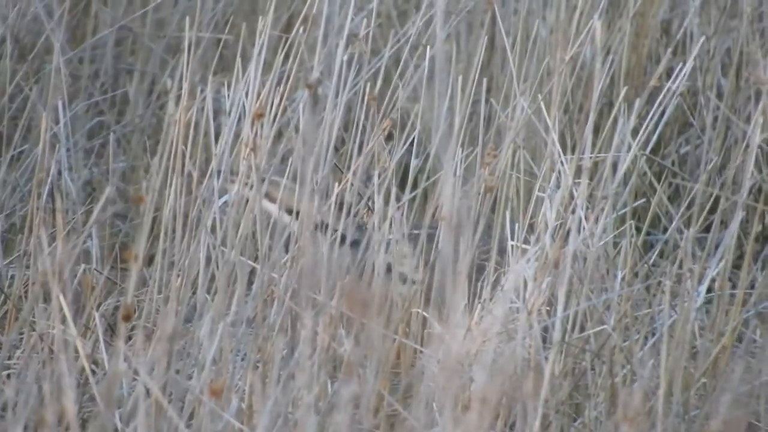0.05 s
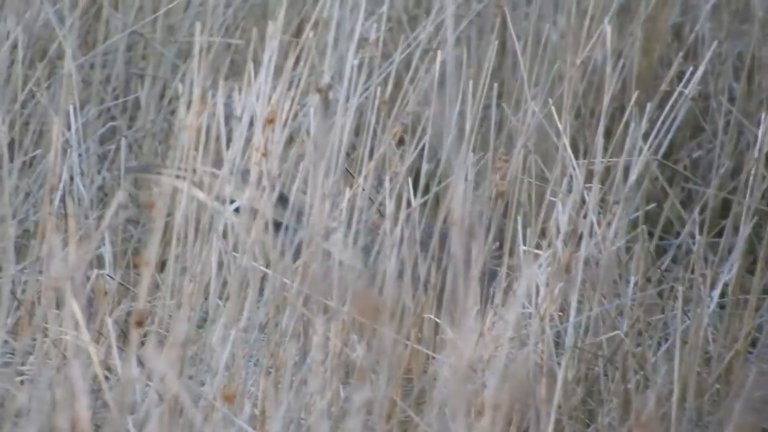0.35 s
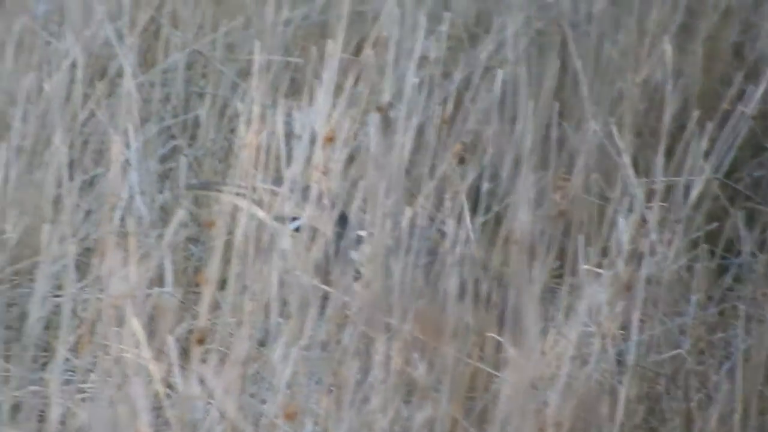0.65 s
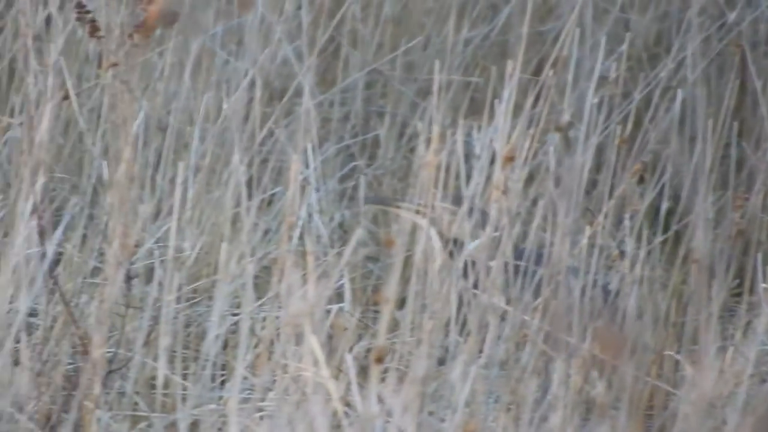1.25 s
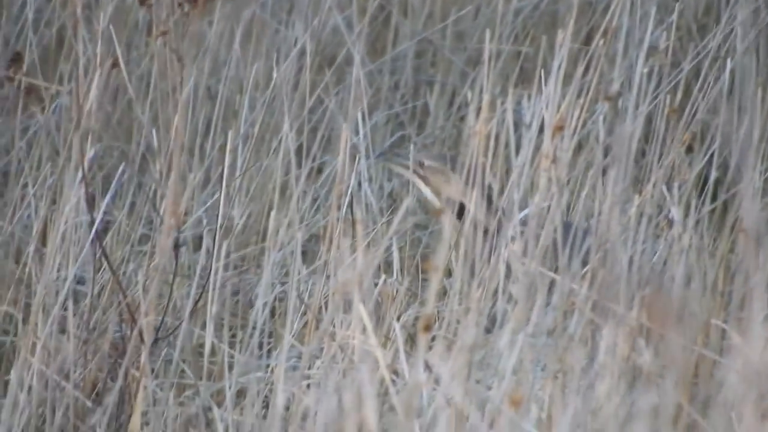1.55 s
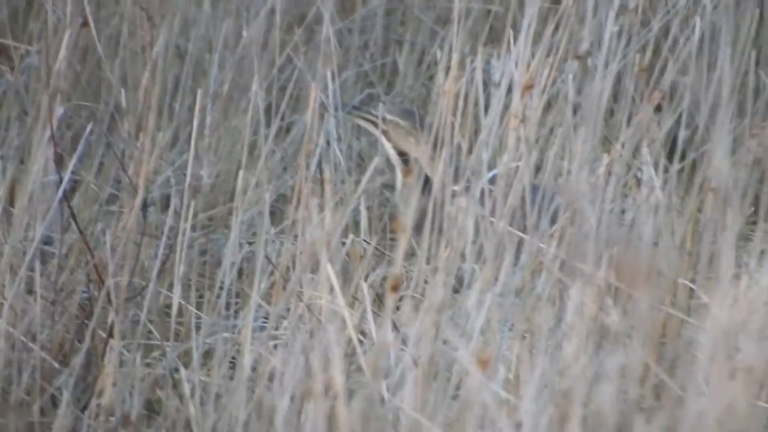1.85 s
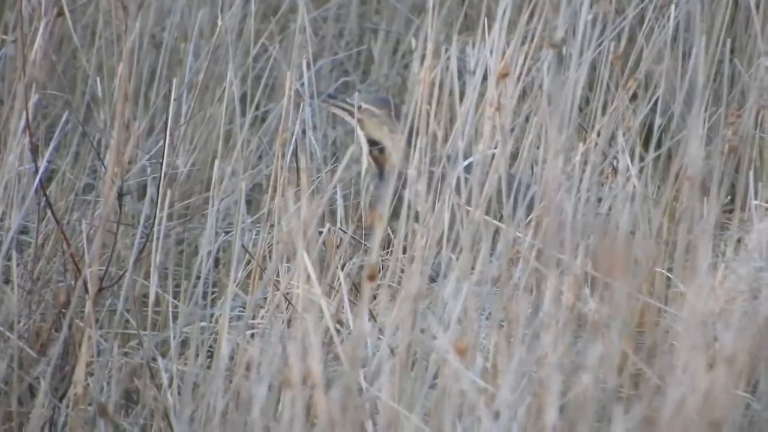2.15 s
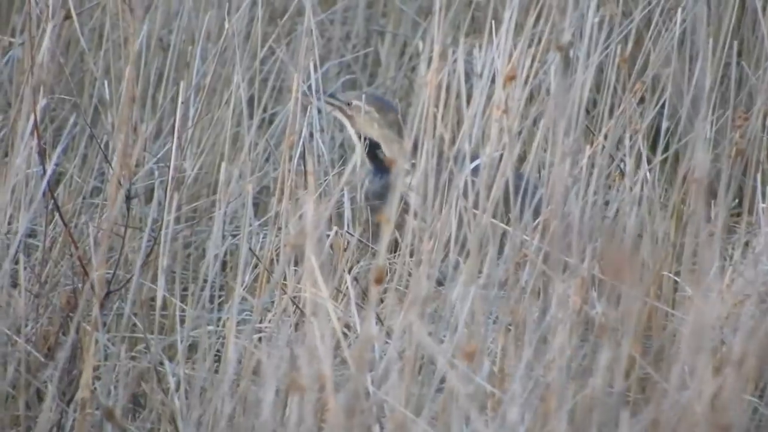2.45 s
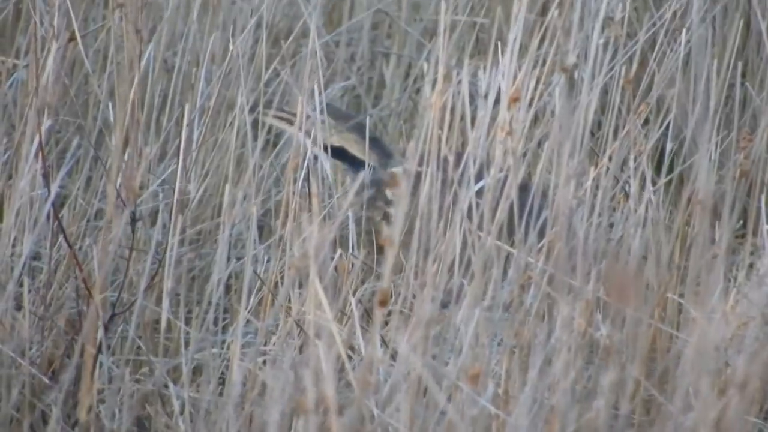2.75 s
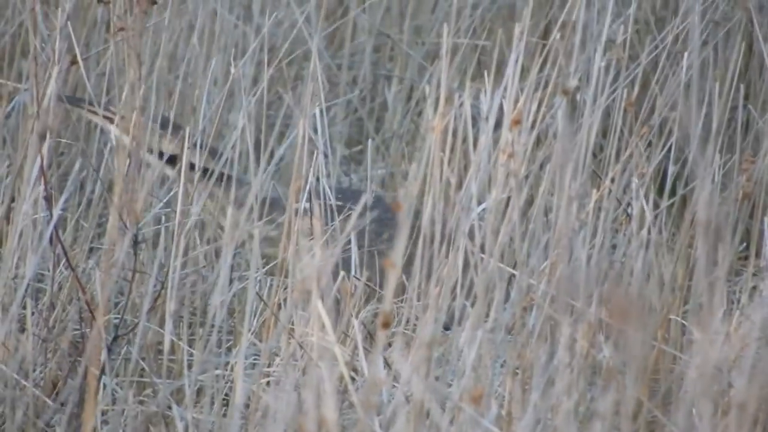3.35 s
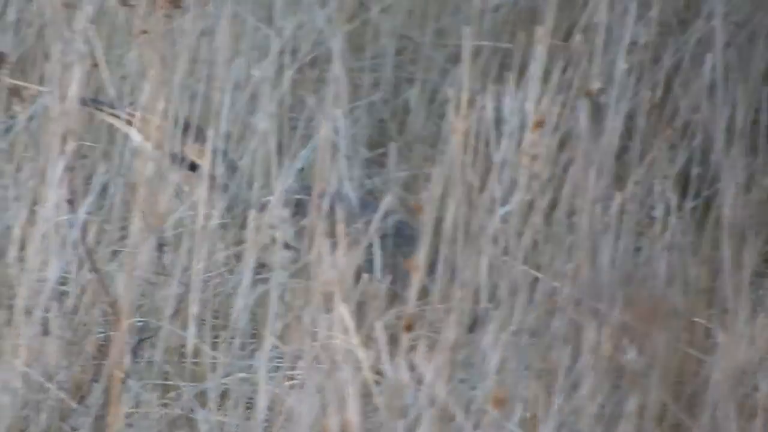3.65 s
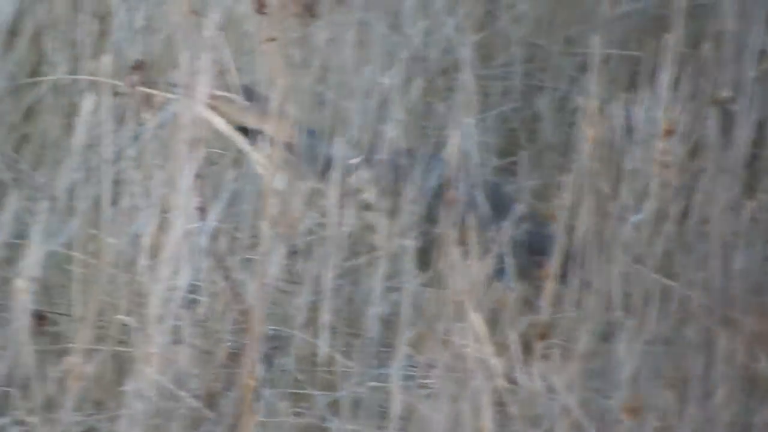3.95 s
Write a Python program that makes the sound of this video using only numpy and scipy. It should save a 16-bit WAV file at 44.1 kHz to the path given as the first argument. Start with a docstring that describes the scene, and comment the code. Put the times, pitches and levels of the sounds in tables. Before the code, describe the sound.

Frogs peep throughout in a reed marsh, one close and many far off. A small bird whistles thin, high notes to the right, then distant birds chip and trill, over soft hiss and a low rumble.

```python
"""Short rising peeps of frogs in a reed marsh, one close by and many far off.
A small bird whistles thin notes to the right; others trill, chip and pipe in the distance.
Each call is a sliding or shaking tone, blurred by echoes from stems and far banks.
Under it all lie a low rumble, soft hiss, a faint whine and a far engine slowly gaining speed."""
import sys
import numpy as np
from scipy import signal
from scipy.fft import rfft, irfft
from scipy.io import wavfile
from scipy.ndimage import uniform_filter1d

SR = 44100
rng = np.random.default_rng(int(sys.argv[2]) if len(sys.argv) > 2 else 0)


def master_out(mix):
    """Clip the mix to full scale and print it as 16-bit PCM to the path in sys.argv[1]."""
    frames = np.transpose(np.atleast_2d(mix))
    ceiling = np.clip(frames, -1, 1)
    pcm = np.round(ceiling * 32767).astype(np.int16)
    wavfile.write(sys.argv[1], SR, pcm)


N = 176400  # 4 seconds


def amp(db):
    """Turns decibels into a number to multiply by."""
    return 10 ** (np.asarray(db) / 20)


def unit(x):
    """Scales a signal to an average power of 1."""
    return x / np.sqrt(np.mean(x ** 2) + 1e-20)


def look_up(points, hz):
    """Reads between the rows of a (frequency, value) table, giving every octave equal room."""
    f, value = np.transpose(points)
    return np.interp(np.log(hz + 1), np.log(f), value)


def add(mix, start, sound):
    """Mixes in a stereo sound at a start time in seconds."""
    at = round(start * SR)
    sound = sound[:, max(-at, 0):]
    part = mix[:, max(at, 0):][:, :sound.shape[1]]
    part += sound[:, :part.shape[1]]


def pan(db):
    """Left and right gains: above 0 dB the sound leans left, below it right."""
    return amp([[db / 2], [-db / 2]])


def phase_of(hz):
    """Adds up a changing pitch into the angle of a sine wave."""
    return 2 * np.pi * np.cumsum(hz) / SR


def wander(size, rate_hz):
    """Smooth random drift, about 1 in size; a higher rate moves faster."""
    spectrum = rfft(rng.standard_normal(max(size, SR)))
    hz = np.linspace(0, SR / 2, len(spectrum))
    return unit(irfft(spectrum * np.exp(-.5 * (hz / rate_hz) ** 2)))[:size]


def roughen(note, depth, rate_hz):
    """Makes a note flutter unevenly while keeping its average power."""
    return note * (1 + depth * wander(len(note), rate_hz)) / np.sqrt(1 + depth ** 2)


def reeds(x, fade_s, build_s=0.0024):
    """Stems and far banks throw back a spray of small echoes that falls 60 dB in fade_s."""
    t = np.arange(SR * 3 // 4) / SR
    echoes = rng.standard_normal((3, len(t))) * amp(-60 * t / fade_s) * np.minimum(t / build_s, 1)
    tail = echoes[:2] + 0.56 * echoes[2]  # both ears share a part
    tail /= np.linalg.norm(tail, axis=1, keepdims=True)
    return signal.fftconvolve(x, tail, axes=1)[:, :N]


def noise(shape, patchy_db, lull_db=0, lull_hz=870, lull_at_s=2.5, lull_width_s=0.3):
    """Stereo noise of a given tone colour, with drifting patches and an optional brief midrange dip."""
    # how alike the two ears are: f/Hz, likeness (0 to 1)
    likeness = [(30, 0.57), (90, 0.74), (190, 0.78), (350, 0.49), (1200, 0.6), (2500, 0.21), (6000, 0.078)]
    hz = np.fft.rfftfreq(4096, 1 / SR)
    a, b, c, d, patches = rng.standard_normal((N // 1024 + 5, len(hz), 5)).T
    patches = uniform_filter1d(patches, size=20, axis=0)  # smooth across pitch
    patches = unit(uniform_filter1d(patches, size=5, axis=1))  # and across time
    same = look_up(likeness, hz)[:, None]
    left = a + 1j * b
    right = same * left + np.sqrt(1 - same ** 2) * (c + 1j * d)
    t = np.linspace(0, N / SR, left.shape[1])
    lull = np.exp(-np.log2((hz[:, None] + 1) / lull_hz) ** 2 - ((t - lull_at_s) / lull_width_s) ** 2)
    gain = amp(look_up(shape, hz)[:, None] + patchy_db * patches + lull_db * lull)
    _, sound = signal.istft(gain * np.array([left, right]), nperseg=4096, noverlap=3072)
    return unit(sound[:, :N])


def rumble(level_db=-51.5):
    """A far rumble: deep noise that swells and sinks."""
    # the swell: t/s, level change/dB
    swell = [(0, 0), (.4, 0.5), (.55, 2.5), (.8, -0.5), (1.12, 5), (1.35, -3.5), (1.65, 2), (4, 1)]
    # tone colour: f/Hz, relative level/dB
    shape = [(20, -37), (35, -17), (55, -10.5), (80, 2.5), (130, -2), (190, 3), (240, -8.5), (300, -33),
             (1200, -70)]
    swell_db = np.interp(np.arange(N) / SR, *np.transpose(swell))
    return amp(level_db + swell_db) * noise(shape, patchy_db=1.0)


def hiss(level_db=-51.5):
    """The soft hiss of the air; its middle range eases once for a moment."""
    # tone colour: f/Hz, relative level/dB
    shape = [(28, -7.5), (330, 1.5), (480, -1.5), (800, 1.5), (1250, -2), (1700, -3.5), (2600, -4.5),
             (4000, -3), (6500, -5), (8500, -5.5), (11000, -12.5), (15500, -19.5)]
    return amp(level_db) * noise(shape, patchy_db=2.5, lull_db=-3)


def whine():
    """A very faint, high whine of three pure tones."""
    # steady tones: f/Hz, level/dB
    tones = [(7434, -78.5), (7483, -77), (12947, -82)]
    t = np.arange(N) / SR
    return sum(np.sqrt(2) * amp(db) * np.sin(2 * np.pi * hz * t) for hz, db in tones)


def engine():
    """A far engine gains speed: one low, slowly climbing note with a trace of its octave."""
    # path of the hum: t/s, f/Hz, level/dB
    hum = [(0, 143, -71), (.7, 145.3, -55.5), (1.15, 149.9, -46.5), (1.55, 153.4, -48.5), (2, 157.1, -46),
           (2.6, 160.5, -45), (3.25, 163.5, -43.5), (4, 165.9, -48)]
    times, hz, db = np.transpose(hum)
    t = np.arange(N) / SR
    phase = phase_of(np.interp(t, times, hz) + 0.602 * wander(N, 1.26))
    level = amp(np.interp(t, times, db) + .5 * wander(N, 0.56))
    return np.sqrt(2) * level * (np.sin(phase) + amp(-31) * np.sin(2 * phase))


def bird_pipes(edge_s=0.004):
    """Far birds pipe faint, reedy notes: tones that slide and flutter."""
    # notes: start/s, length/s, f/Hz, rise/Hz, level before echo/dB, flutter depth
    notes = [(1.632, 0.044, 5600, 94, -57.5, .4), (2.88, .125, 2180, -20, -62.5, 0.29),
             (3.5, 0.18, 4700, 242, -63, 1.2), (2.907, .12, 6080, 252, -66, 1.3),
             (3.338, .032, 5550, 200, -55, 0.66), (3.31, 0.131, 2630, 50, -55, 0.57)]
    out = np.zeros((2, N))
    for start, length, hz, rise_hz, db, flutter in notes:
        t = np.arange(0, length, 1 / SR)
        swell = np.clip(np.minimum(t, length - t) / edge_s, 0, 1)
        note = np.sqrt(2) * swell * np.sin(phase_of(hz + rise_hz * t / length))
        add(out, start, amp(db) * pan(0.84) * roughen(note, flutter, rate_hz=134))
    return out + amp(1.5) * reeds(out, fade_s=.15)


def bird_chips():
    """Short, hoarse bird calls: tones whose pitch shakes fast."""
    # calls: middle/s, length/s, f/Hz, pitch shake/Hz, level before echo/dB
    calls = [(.664, .034, 5730, 450, -52.5), (1.257, 0.032, 5710, 500, -51.5),
             (1.285, .028, 4500, 380, -50), (1.306, 0.012, 4490, 380, -49),
             (1.946, 0.045, 4820, 282, -50.5), (2.27, 0.04, 4250, 400, -56),
             (2.542, 0.065, 1253, 35, -51.5), (2.833, .028, 2330, 120, -49),
             (2.948, 0.023, 3530, 70, -49.5), (3.008, 0.012, 2080, 60, -49.5),
             (3.028, 0.029, 1026, 60, -54.5), (3.055, 0.02, 3434, 90, -42.5), (3.06, 0.03, 2410, 80, -54),
             (3.0896, 0.0056, 5260, 100, -39), (3.168, 0.014, 3530, 90, -40.5),
             (3.275, .02, 3500, 70, -48.5), (3.638, 0.015, 3540, 90, -41), (3.771, .035, 4550, 230, -48.5),
             (3.916, 0.036, 4540, 200, -50.5)]
    out = np.zeros((2, N))
    for middle, length, hz, shake_hz, db in calls:
        n = round(length * SR)
        pitch = hz + shake_hz * wander(n, 1.83 * shake_hz)
        note = np.sin(phase_of(pitch)) * np.hanning(n) ** 0.19
        add(out, middle - length / 2, np.sqrt(2) * amp(db) * pan(-1.4) * note)
    return out + amp(-5) * reeds(out, fade_s=0.22)


def bird_trills(note_s=0.024, fall_s=.0075, jitter_s=0.00088):
    """Quick runs of tiny notes, each dropping steeply in pitch, smeared by the stems they pass."""
    # runs: start/s, notes, spacing/s, top f/Hz, bottom f/Hz, level before echo/dB, fade per note/dB
    runs = [(.011, 19, .0225, 4850, 3750, -51.5, -16), (3.1105, 25, .02355, 5350, 2250, -50, -6)]
    out = np.zeros((2, N))
    t = np.arange(0, note_s, 1 / SR)
    swell = np.clip(t / 0.00033, 0, 1) * np.clip((note_s - t) / .006, 0, 1)
    for start, count, spacing, top_hz, low_hz, db, fade_db in runs:
        hz = low_hz + (top_hz - low_hz) * np.exp(-(t / fall_s) ** 1.283)
        for k, (extra_db, detune, late) in enumerate(rng.standard_normal((round(count), 3))):
            level = swell * amp(db + extra_db + fade_db * t / note_s)
            note = level * np.sin(phase_of(hz * (1 + .05 * detune)))
            add(out, start + k * spacing + jitter_s * late, pan(-2.0) * roughen(note, 0.26, rate_hz=116))
    return out + 1.3 * reeds(out, fade_s=.035) + reeds(out, fade_s=.18)


def bird_whistles(rasp_hz=262, rasp_s=0.011, octave_db=-35, echo_db=-16.5):
    """A small bird whistles thin, nearly pure notes that start hoarse and clear at once."""
    # notes: left minus right/dB, left ear's phase lead/rad, path of (t/s, f/Hz, level/dB)
    notes = [ (-6, 1.2, [(.445, 5910, -64), (.465, 5860, -51.5), (.485, 5580, -62), (.497, 5680, -52.5),
             (.515, 5560, -71)]), (-8, 1.1, [(.625, 5240, -71), (.675, 5320, -44), (.725, 5280, -57),
             (.765, 5300, -62)]), (-1, 1.6, [(.669, 4900, -36), (.675, 5590, -37), (.688, 5840, -34),
             (.705, 5780, -39), (.722, 5795, -61), (.82, 5780, -59)]), (-7.5, 1.83, [(.795, 5150, -58),
             (.815, 5280, -36.5), (.828, 5317, -29.5), (.877, 5396, -32.5), (.907, 5284, -36),
             (.95, 5270, -49.5)]), (-7, 1.5, [(1.263, 5800, -46), (1.277, 5900, -40.5), (1.29, 5950, -48),
             (1.3, 5650, -58), (1.345, 5220, -64)]), (-4.5, 0.88, [(1.365, 5200, -57), (1.412, 5270, -37.5),
             (1.428, 5310, -38), (1.442, 5380, -56), (1.476, 5286, -34.5), (1.505, 5340, -47),
             (1.518, 5260, -37), (1.54, 5130, -71)]), (0, 0, [(1.72, 5200, -60), (1.768, 5230, -45.5),
             (1.82, 5180, -53), (1.895, 5060, -65)]), (-3.5, -0.98, [(2.165, 4880, -50),
             (2.181, 5381, -40.5), (2.193, 5550, -35.5), (2.212, 5340, -47), (2.245, 5170, -68)]),
             (-3.5, -1.44, [(2.26, 5080, -55), (2.303, 5047, -39), (2.33, 5002, -36.5), (2.36, 4895, -38.5),
             (2.387, 4980, -44), (2.41, 5034, -66)]), (-0.5, -0.3, [(2.19, 3660, -47), (2.215, 3280, -42),
             (2.275, 2900, -50.5), (2.41, 2870, -48.5), (2.49, 2760, -71)])]
    out = np.zeros((2, N))
    for pan_db, lead, path in notes:
        times, hz, db = np.transpose(path)
        start, end = times[0], times[-1]
        t = np.arange(start, end, 1 / SR)
        rasp = rasp_hz * np.exp(-(t - start) / rasp_s) * wander(len(t), 450)
        pitch = uniform_filter1d(np.interp(t, times, hz), size=300, mode="nearest")
        phase = phase_of(pitch + rasp) + np.array([[lead], [0]])
        edges = np.clip(np.minimum(t - start, end - t) / 0.0023, 0, 1)
        level = edges * amp(np.interp(t, times, db) + 0.7 * wander(len(t), 72))
        tone = np.sin(phase) + amp(octave_db) * np.sin(2 * phase)
        add(out, start, np.sqrt(2) * pan(pan_db) * level * tone)
    return out + amp(echo_db) * reeds(out, fade_s=0.66)


def peep(length_s, hz, attack_s=0.015, release_s=0.02):
    """One frog call: a pure note that rises, quickly at first and then more slowly."""
    t = np.arange(0, length_s, 1 / SR)
    swell = np.clip(t / attack_s, 0, 1) * np.clip((length_s - t) / release_s, 0, 1)
    rise_hz = 500.5 * (1 - np.exp(-t / 0.1501))
    return np.sqrt(2) * swell * np.sin(phase_of(hz + rise_hz))


def frog_chorus(peeps_per_s=18, middle_hz=3015, spread_hz=165, level_db=-48.5):
    """Many far, hoarser frogs peep in loose turns, high and low, blurred by the marsh."""
    out = np.zeros((2, N))
    for k, (late, detune, strength, side) in enumerate(rng.uniform(-1.1, 1, (160, 4))):
        start = (k - 2 + late / 2) / peeps_per_s
        hz = middle_hz + spread_hz * (detune + (-1) ** k) / 2
        note = roughen(peep(length_s=0.11, hz=hz), depth=.65, rate_hz=116)
        add(out, start, amp(2 * strength) * pan(5 * side) * note)
    blurred = out + 1.25 * reeds(out, fade_s=.25)
    return amp(level_db) * pan(-2.5) * unit(blurred)


def near_frogs(near_db=-30.5, far_db=-51.5):
    """Nearer frogs peep. A quieter one is farther off: rougher, more to the right, with more echo."""
    # calls: start/s, length/s, starting f/Hz, level/dB
    calls = [(.022, 0.059, 2850, -44.5), (.046, 0.084, 3063, -44), (0.319, 0.17, 3130, -55),
             (0.544, 0.11, 2908, -37.5), (0.687, .11, 3068, -45.5), (0.705, 0.051, 2830, -48.5),
             (.875, 0.12, 2970, -46), (1.195, 0.093, 2898, -36), (1.303, 0.072, 3082, -44),
             (1.334, 0.078, 2846, -49), (1.654, 0.056, 3144, -40), (1.705, 0.079, 3250, -45.5),
             (1.839, 0.11, 2890, -34), (1.978, 0.096, 3036, -41.5), (2.545, 0.11, 2880, -35.5),
             (2.656, .09, 3030, -43), (2.686, 0.071, 2822, -50), (2.783, .072, 2995, -33.5),
             (3.454, 0.1, 2883, -43.5), (3.53, .075, 3020, -44), (3.948, .07, 2867, -39)]
    direct, scattered = np.zeros((2, 2, N))
    for start, length, hz, db in calls:
        distance = np.clip((near_db - db) / (near_db - far_db), .1, .85)
        note = roughen(peep(length, hz), depth=0.65 * distance, rate_hz=180)
        note = amp(db) * pan(-2.5 * distance ** 2) * note
        add(direct, start, np.sqrt(1 - distance ** 2) * note)
        add(scattered, start, distance * note)
    return direct + reeds(scattered, fade_s=.17)


def scene():
    """The whole marsh: background, frogs and birds."""
    background = rumble() + hiss() + whine() + engine()
    frogs = frog_chorus() + near_frogs()
    birds = bird_whistles() + bird_trills() + bird_chips() + bird_pipes()
    return background + frogs + birds


def record(dry):
    """Cuts away the very highest treble."""
    cutoff_hz = 15720
    low_pass = signal.firwin(801, cutoff_hz, window=("kaiser", 9), fs=SR)
    return signal.oaconvolve(dry, low_pass[None], "same")


dry = scene()
out = record(dry)
master_out(out)
```